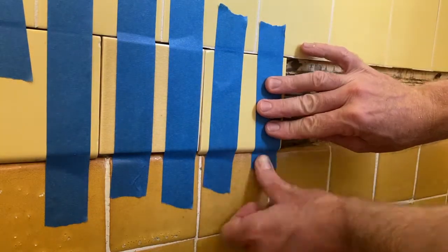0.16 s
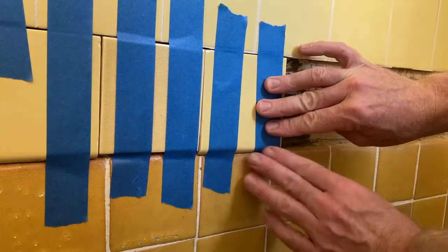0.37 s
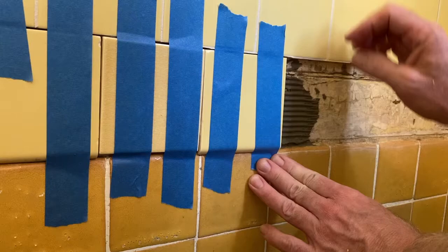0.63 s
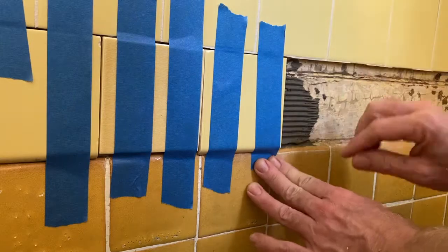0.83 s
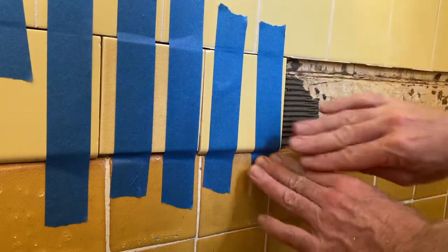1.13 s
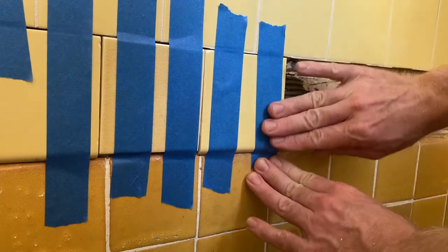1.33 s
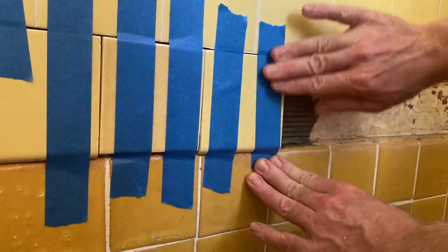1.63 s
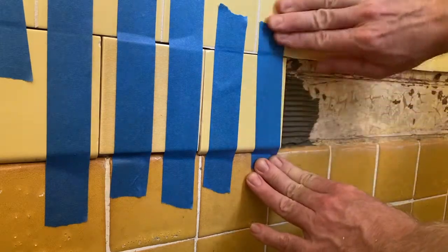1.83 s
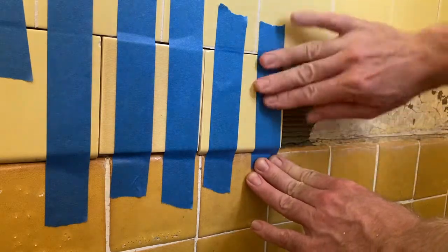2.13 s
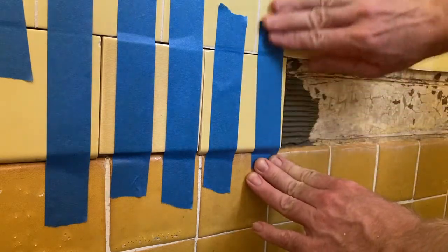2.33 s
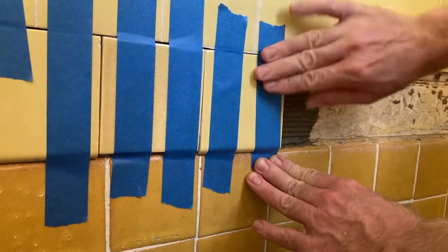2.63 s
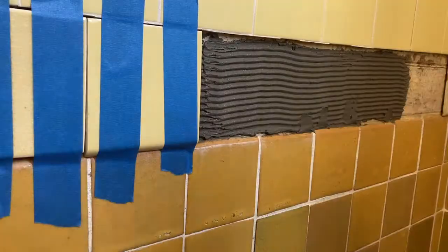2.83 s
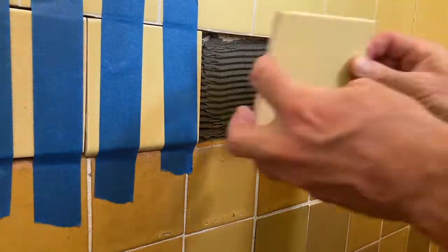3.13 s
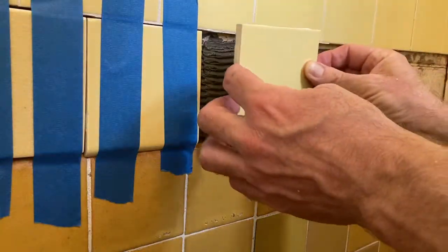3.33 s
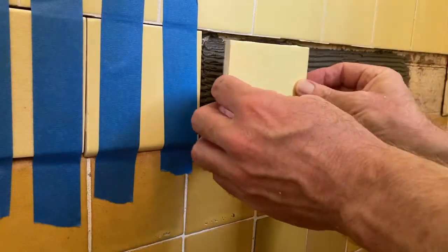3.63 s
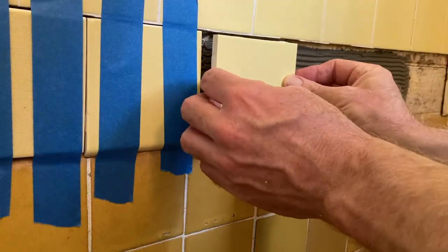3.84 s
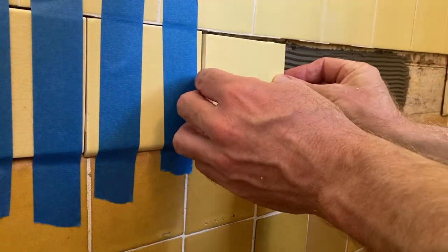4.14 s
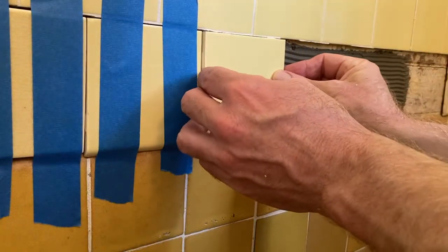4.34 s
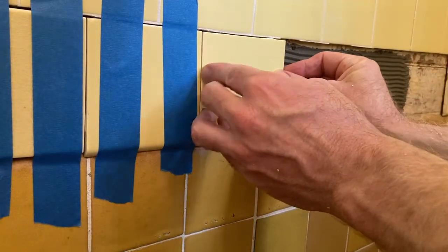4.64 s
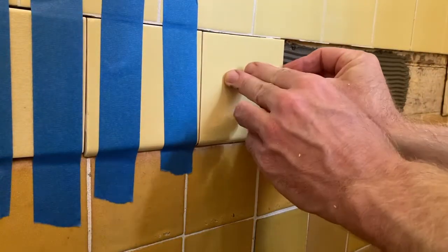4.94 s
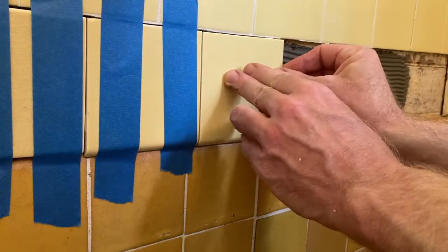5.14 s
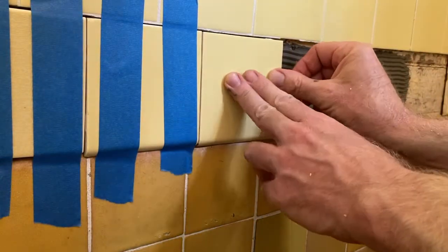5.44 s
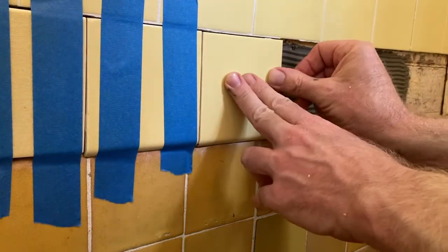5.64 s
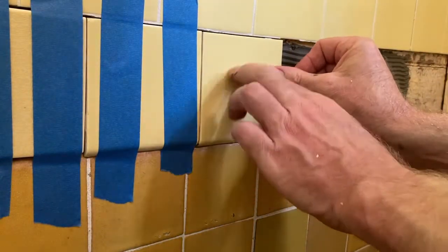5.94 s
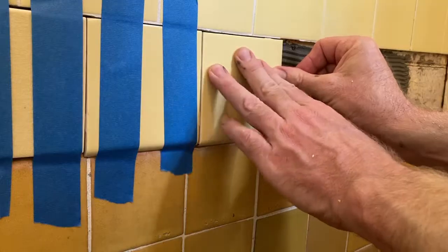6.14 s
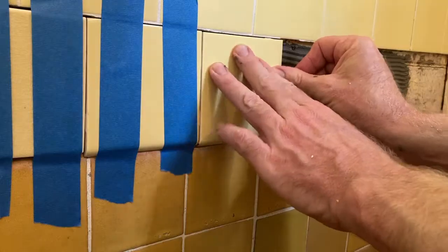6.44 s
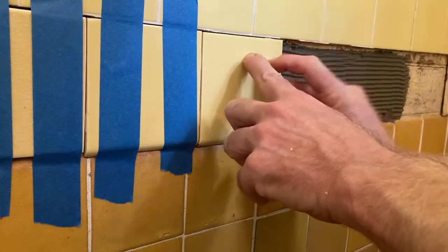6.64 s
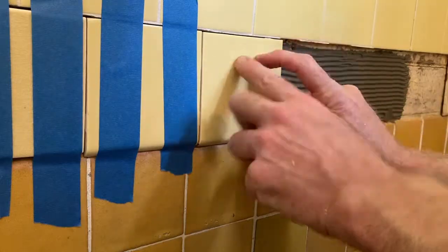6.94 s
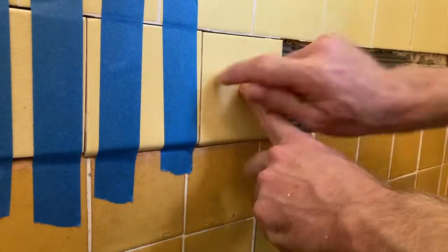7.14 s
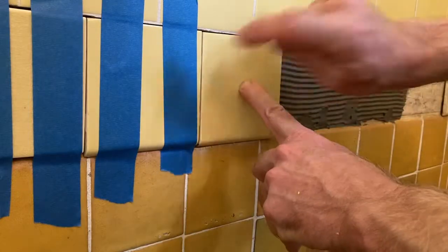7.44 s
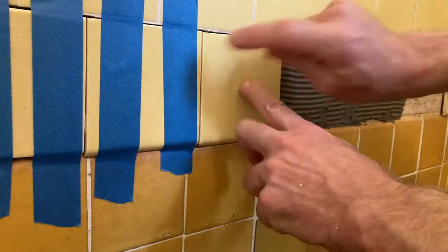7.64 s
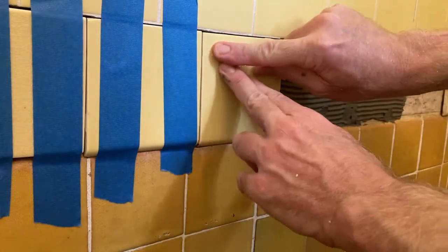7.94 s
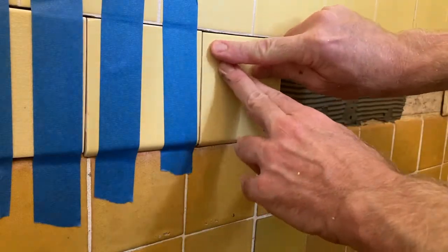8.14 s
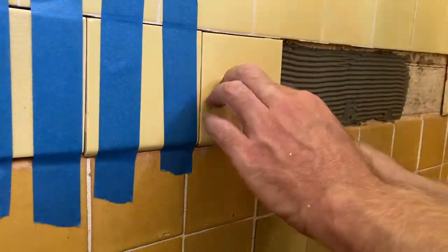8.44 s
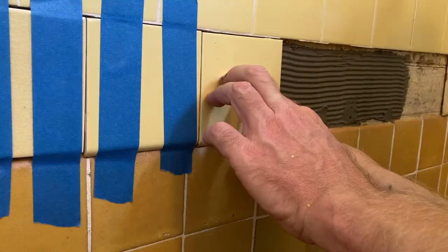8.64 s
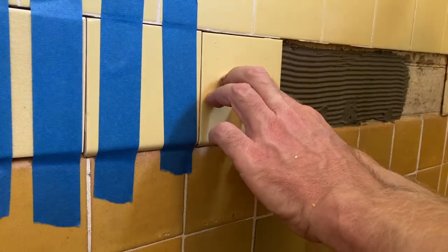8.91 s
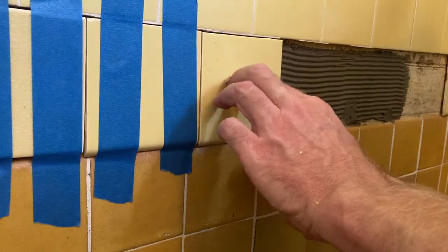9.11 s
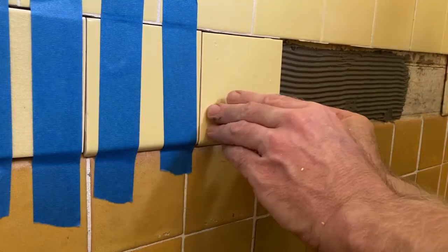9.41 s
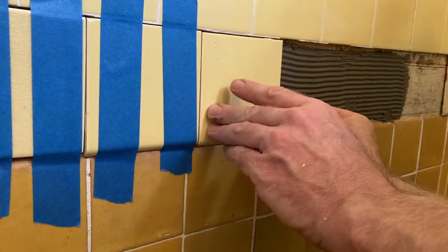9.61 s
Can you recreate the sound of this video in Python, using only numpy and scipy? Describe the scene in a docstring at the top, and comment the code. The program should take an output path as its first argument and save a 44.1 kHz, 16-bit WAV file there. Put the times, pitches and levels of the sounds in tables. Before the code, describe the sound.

Soft thump and dry hissing rubs of tape on tile, faint gritty crackles, then two rapid volleys of hollow finger knocks in a humming bathroom.

```python
"""A finger knocks a wall tile home in its gritty adhesive, in two quick runs, in a small bathroom: each knock
sums a contact tick, the damped bending modes of the tile and the delayed boom of the hollow wall.
Before that, masking tape is torn and rubbed down: filtered noise stands for friction, short bursts for cracks.
Behind lie a drone until 0.82 s, a low rumble until 2.728 s, then a quiet room tone with a motor of
wavering harmonics that slows once, a swelling hum and a distant rumble."""
import sys
import numpy as np
from scipy import signal
from scipy.fft import rfft, irfft
from scipy.io import wavfile
from scipy.ndimage import uniform_filter1d, map_coordinates

SR = 44100
rng = np.random.default_rng(int(sys.argv[2]) if len(sys.argv) > 2 else 0)


def wav_record(signal):
    """Record a signal, one row per channel, as 16-bit PCM in the file named by sys.argv[1]."""
    frames = np.transpose(np.atleast_2d(signal))
    bounded = np.clip(frames, -1, 1)
    # unit amplitude maps onto the largest positive 16-bit level
    quanta = np.round(bounded * 32767).astype(np.int16)
    wavfile.write(sys.argv[1], SR, quanta)


N = 430857

# Every spectrum below, each row: frequency in Hz, relative level in dB per Hz.
# Spectra of the drone, the low rumble, the quiet room and the distant rumble.
DRONE_SPECTRUM = [(30, -48), (53, -7), (80, -14), (108, -7), (138, -5.5), (165, -1), (245, -11.5),
                  (320, -1), (400, -17), (590, -11), (720, -22.5), (860, -21), (1400, -37.5),
                  (14000, -59.5)]
RUMBLE_SPECTRUM = [(25, -6), (56, -2.5), (85, 0), (115, -8.5), (155, -8), (290, -10), (470, -24),
                   (620, -33), (1500, -42.5), (6500, -56.5), (16000, -62)]
QUIET_SPECTRUM = [(25, -36), (50, -16), (85, -15), (140, -2.5), (220, -16), (330, -25), (520, -31),
                  (800, -40), (1250, -38.5), (2000, -48.5), (4000, -49.5), (9000, -53.5), (16000, -62)]
FAR_SPECTRUM = [(40, -12), (75, 2), (150, -4.5), (290, -4), (380, -16.5), (500, -9.5), (720, -23.5),
                (1000, -32), (3000, -43.5)]
# Level of the distant rumble. Each row: time in seconds, level in dB.
FAR_LEVEL = [(3.8, -93), (4.25, -62.5), (5.4, -66.5), (5.85, -56), (6.2, -63.5), (9.7, -62.5)]
# Steady tones within the drone and the rumble. Each row: frequency in Hz, level in dB.
DRONE_TONES = [(112, -52), (600, -63)]
RUMBLE_TONES = [(55, -50), (165, -59)]
# Harmonics of the motor. Each row: multiple of the speed, relative level in dB when fast, in dB when slow.
HARMONICS = [(1, -26, -19), (2, -0.5, -0.5), (5, -23, -15.5), (6, -24.5, -13.5), (8, -29, -36),
             (10, -56, -26.5)]
# A second hum that swells and sinks. Each row: time in seconds, frequency in Hz, level in dB.
SWELL = [(2.75, 170, -57.5), (3.97, 168, -55), (4.61, 167.8, -50.5), (5.42, 166.6, -47),
         (5.8, 163.4, -51.5), (5.97, 162.4, -71), (6.5, 162.8, -51), (8.15, 162.7, -54),
         (8.35, 163.2, -44.5), (8.65, 165.1, -55.5), (9.03, 163.6, -43), (9.35, 165.3, -46),
         (9.62, 167.4, -58), (9.75, 162.2, -42.5)]
DRONE_END_S, RUMBLE_END_S = .82, 2.728
DRONE_DB, RUMBLE_DB, QUIET_DB = -50, -48.5, -59
MOTOR_FAST_HZ, MOTOR_SLOW_HZ, MOTOR_DB = 58, 54.8, -51
SLOWDOWN_S, SLOWDOWN_LENGTH_S = 5.55, 0.2

# Scuffs while handling tape and tile. Each row: start in seconds, length in seconds, level in dB.
SCUFFS = [(0.039, 0.049, -62.5), (0.11, 0.16, -66.5), (0.916, 0.06, -70), (2.805, 0.17, -61.5),
          (2.927, 0.18, -65.5), (3.03, 0.11, -64.5), (4.594, 0.037, -73), (8.252, 0.28, -66)]
# Spectra of the gritty scuffs and of a fingertip dragging over the tape's edge.
GRIT_SPECTRUM = [(410, -15), (700, -6.5), (900, -6.5), (1920, -10.5), (3640, -10.5), (4100, -12),
                 (8880, -13.5), (10500, -19.5), (15000, -30)]
DRAG_SPECTRUM = [(900, -33), (1500, -4.5), (1950, 8.5), (2600, -12), (3100, -6), (4500, -19), (9000, -20),
                 (16000, -26)]
# a scuff swells over this share of its length, then dies away after its end
SCUFF_ATTACK_SHARE, SCUFF_RELEASE_T60_S = 0.39, 0.59
DRAG_START_S, DRAG_PEAK_S, DRAG_END_S, DRAG_DB = 0.245, 0.256, 0.3, -46

# Tape snapping and grit cracking. Each row: time in seconds, level in dB.
CRACKS = [(0.0581, -59), (0.0715, -60), (0.094, -59), (0.0998, -54.5), (2.911, -58), (2.944, -66),
          (3.075, -70), (3.405, -73), (4.622, -65), (4.6535, -56), (4.665, -65), (4.669, -68), (4.921, -76),
          (5.328, -76.5), (5.609, -73), (6.378, -69.5), (8.363, -55.5)]
CRACK_SPECTRUM = [(500, -11), (1400, -1), (2000, 0), (2900, -6.5), (5500, -4), (9400, -8), (11400, -16),
                  (14700, -7), (16000, -8)]
CRACK_ROOM_T60_S = 0.096

# Fingers landing softly, the tile shifting under them. Each row: time in seconds, wall boom level in dB,
# wall thud level in dB, tile ring level in dB.
PRESSES = [(0.0997, -35.5, -41, -60), (2.189, -51, -48, -73), (4.623, -54, -52.5, -63),
           (4.653, -58, -52, -58.5), (5.63, -42.5, -56, -64), (6.564, -46, -64, -68.5),
           (7.042, -42.5, -51.5, -71), (7.968, -54, -58, -71), (8.063, -47, -60, -54.5),
           (8.363, -49.5, -58.5, -65)]
# Spectra of the boom and the thud of a pressed wall.
PRESS_BOOM_SPECTRUM = [(53, -36.5), (100, -2.5), (155, 6.5), (240, -19.5), (600, -45.5)]
PRESS_THUD_SPECTRUM = [(200, -27.5), (340, 0.5), (410, -15.5), (480, -8), (600, -13.5), (720, -13),
                       (900, -25), (2600, -70)]

# Finger strokes that rub the tape down. Each row: start in seconds, length in seconds, hiss level in dB,
# low rasp level in dB.
RUBS = [(1.348, 0.41, -58, -60), (1.514, 0.16, -52.5, -50.5), (1.63, 0.099, -48, -49.5),
        (1.713, 0.11, -49.5, -49), (2.168, 0.19, -44.5, -50), (2.617, 0.044, -56, -59),
        (2.652, 0.093, -48.5, -60)]
TAPE_SPECTRUM = [(290, -37), (500, -5), (800, -9.5), (1500, -23), (2200, -13), (3100, -19), (4500, -15.5),
                 (5300, -25.5), (7400, -9), (9100, -21), (10000, -10.5), (11200, -8.5), (12900, -16.5),
                 (13700, -26), (15000, -18)]
# Resonances of the tile under the rubbed tape. Each row: frequency in Hz, width in Hz, relative level in dB.
RASP_MODES = [(390, 70, -4.5), (610, 42, 1.5), (787, 27, 1.5), (967, 81, -7.5), (1270, 510, -19)]
RUB_ATTACK_S, RUB_RELEASE_T60_S = 0.053, 0.23
# each resonance swells and sinks as the fingers pass over it (dB, times per s)
RASP_SWING_DB, RASP_SWING_RATE = 3.5, 14

# Grit crushed behind the shifting tile. Each row: start in seconds, length in seconds, level in dB.
CRUNCHES = [(2.902, .02, -60), (3.07, .008, -67), (4.654, .016, -62), (5.625, .03, -55), (8.07, .008, -55),
            (8.36, .014, -56.5), (8.718, .006, -59)]
CRUNCH_SPECTRUM = [(500, -13), (1000, 0), (1400, -5.5), (1950, 1.5), (2400, -4.5), (2950, 0), (3400, -6),
                   (6300, -15), (10000, -29), (15000, -38)]
CRUNCH_ATTACK_S, CRUNCH_RELEASE_T60_S = .005, .15

# Finger knocks on the tile. Each row: time in seconds, force in dB, hardness in dB, where 0 is the bare nail
# and lower is more of the fingertip.
KNOCKS = [(6.669, -23, -31), (6.7596, -18.5, -25.5), (6.8517, -17.5, -28.5), (6.936, -18.5, -31.5),
          (7.165, -24.5, -26.5), (7.2618, -23.5, -24.5), (7.3516, -22.5, -18.5), (7.439, -21, -11),
          (7.5306, -20, -12), (7.6194, -20.5, -10.5), (7.704, -27, -16), (7.821, -46.5, -16),
          (8.0722, -43, -25), (8.128, -52, -26), (8.72, -50, -36)]
# Times in seconds at which the finger moves to a new spot on the tile.
NEW_SPOT_S = [7.1, 7.9]
# What each spot adds to the force. Each row: wall boom in dB, wall body in dB, tile clack in dB,
# wall modes near 300 Hz in dB.
SPOTS = [(-1, -8.5, 0.3, -2.5), (0.25, 1, -1, 3), (-2.5, -1, 2, -18)]
# Modes of the hollow wall, of the tile on its adhesive, and the tile's high, quickly damped modes.
# Each row: frequency in Hz, relative level in dB, 60 dB decay time in seconds.
WALL_MODES = [(88, -16.5, .22), (121.9, -8.5, 0.22), (144.2, -3, 0.13), (163.7, 3, 0.17),
              (225, -13.5, 0.33), (292.6, -4.5, 0.22), (320.2, -1.5, 0.13), (433.7, -6.5, 0.096),
              (480.4, -9.5, 0.15), (537, -9, 0.18), (569, -10, 0.19), (666.4, -10, 0.13), (730, -3, 0.11)]
TILE_MODES = [(1113, -9.5, 0.07), (1181, 1, 0.067), (1234, -3, 0.091), (1383, -6, 0.09), (1556, -1, 0.074),
              (1626, -14.5, 0.063), (2094, -10.5, 0.09), (2370, -12.5, 0.07), (2550, -15.5, .07)]
GLAZE_MODES = [(2300, 5, .02), (2650, 0, .018), (3590, 2.5, .019), (4400, 3.5, .018), (5550, -4, .018),
               (6280, -1, 0.02), (8200, 1.5, .018), (9400, -2, .018)]
# Spectra of the contact tick, the tile's clatter and the scattered part of the wall's body.
TICK_SPECTRUM = [(1500, -20.5), (2100, -6), (3100, -13.5), (3600, -5.5), (4400, -8.5), (5000, -12),
                 (6200, -14), (7500, -18.5), (9500, -16), (11000, -32.5), (13000, -25), (15000, -16.5)]
CLATTER_SPECTRUM = [(600, -14.5), (900, -10.5), (1150, 9), (1600, -3), (1900, -11), (2500, -15),
                    (3500, -35)]
BODY_SPECTRUM = [(150, -18.5), (230, -10.5), (320, -7), (390, -8.5), (550, -7), (740, -2), (900, -18.5),
                 (1600, -53)]
# wall modes below this swing up slowly as a boom
BOOM_TOP_HZ = 200
# the tile's first bending mode and its overtone, before the firmness of the blow shifts their pitch
FLEX_HZ, FLEX_RISE_S = 1420, .00058
OVERTONE_HZ, OVERTONE_DB = 2190, -13
# levels against the first bend
RING_DB, CLATTER_DB = -4, -4
# the contact tick follows the hardness fully, the clack by a share of it
TICK_DB, CLACK_SHARE = -1.5, .25
# level of the high modes against the force; each varies in strength from knock to knock
GLAZE_DB, GLAZE_SPREAD_DB = 7, 3.5
# a soft contact loses more of the high modes the higher they lie (Hz, exponent)
SOFT_HZ, SOFT_POWER = 6100, 0.46
# lag between the microphone ports, longer for the high modes
PORT_LAG_S, GLAZE_LAG_S = 0.00013, .00027
TOP_HZ = 16300


def undb(db):
    """Level in decibels is twenty times the logarithm of the gain; this inverts it."""
    return 10 ** (np.asarray(db) / 20)


def unit(x):
    """Root mean square as the measure of steady strength: scale it to 1."""
    return x / np.sqrt(np.mean(x ** 2))


def unit_hit(x):
    """Energy as the measure of a blow: scale it to that of 50 ms at rms 1."""
    energy = np.sum(x ** 2) / len(x)
    return x / np.sqrt(energy / (SR / 20))


def curves(table):
    """Linear interpolation in time of each column after the first."""
    s, *columns = np.transpose(table)
    return [np.interp(np.arange(N) / SR, s, c) for c in columns]


def between(start, end):
    """Gating: a sound passes between two times, with 10 ms edges."""
    t = np.arange(N) / SR
    return uniform_filter1d(1. * ((t >= start) & (t < end)), size=441)


def walk(rate):
    """Slow random fluctuation: held random steps, smoothed twice, with a spread near 1."""
    k = max(int(SR / rate), 1)
    steps = np.repeat(rng.standard_normal(N // k + 1), k)
    return 1.3 * uniform_filter1d(uniform_filter1d(steps, k), k)[:N]


def colour(x, spectrum):
    """Minimum-phase filtering: the folded cepstrum makes a causal response with the given outline."""
    size = 4096
    hz, db = np.transpose(sorted(spectrum))
    bins_hz = np.arange(size // 2 + 1) * SR / size
    log_gain = np.log(undb(np.interp(np.log(bins_hz + 1), np.log(hz), db)))
    cepstrum = irfft(log_gain)
    cepstrum[1:size // 2] *= 2
    cepstrum[size // 2 + 1:] = 0
    response = irfft(np.exp(rfft(cepstrum)))
    return signal.fftconvolve(x, response[None], axes=1)[:, :x.shape[1]]


def pair(n, width):
    """Interaural coherence: noise of width 0 is the same left and right, of width 1 unrelated."""
    mid, side = rng.standard_normal((2, n))
    return np.array([mid + width * side, mid - width * side])


def from_left(x, lag):
    """Time difference of arrival: the sound reaches the right port a moment after the left."""
    i = np.arange(x.shape[1])
    return np.array([x[0], map_coordinates(x[1], [i - lag * SR], order=3)])


def fade(t, t60):
    """Exponential decay of a damped vibration, 60 dB in t60 seconds."""
    return undb(-60 * t / max(t60, .002))


def ring(modes, t, detune, spread_db=0):
    """Modal superposition: damped sines, varied in pitch and, with a spread, in strength at every blow."""
    pitch, strength = rng.standard_normal((2, len(modes)))
    y = 0
    for k, (hz, db, t60) in enumerate(modes):
        gain = (-1) ** k * undb(db + spread_db * strength[k])
        y = y + gain * fade(t, t60) * np.sin(2 * np.pi * hz * (1 + detune * pitch[k]) * t)
    return np.array([y, y])


def burst(t, spectrum, direct_t60, room_db, room_t60, width, wall_hz=16000):
    """Impulse and reverberation: a short crack plus decaying reflections, weakened above wall_hz."""
    direct = pair(len(t), 0) * fade(t, direct_t60)
    room = pair(len(t), width) * fade(t, room_t60) * undb(room_db)
    dull = signal.sosfilt(signal.butter(4, wall_hz, fs=SR, output="sos"), room)
    return unit_hit(colour(direct + dull, spectrum))


def add(out, s, x):
    """Superposition: mix x into out from time s."""
    i = max(int(s * SR), 0)
    out[:, i:i + x.shape[1]] += x[:, :N - i]


def stroke(start, length, attack, release_t60):
    """Envelope of one hand movement: it gathers speed, holds and decays exponentially."""
    t = np.arange(N) / SR - start
    onset = np.clip(t / max(attack, .002), 0, 1) ** 2
    return onset * fade(np.maximum(t - length, 0), release_t60)


def friction(spectrum, grain_db, slip_db):
    """Stick-slip friction: countless tiny catches of a rough surface, in uneven slips."""
    catches = undb(grain_db * walk(1500) + slip_db * walk(77.0))
    return unit(colour(pair(N, width=0.88) * catches, spectrum))


def air(spectrum, db):
    """Diffuse-field noise, gently fluttering: coherent in the bass, spread wide in the treble."""
    highpass = signal.butter(1, 900, "high", fs=SR, output="sos")
    treble_side = signal.sosfilt(highpass, rng.standard_normal(N))
    noise = pair(N, width=.08) + .7 * np.array([treble_side, -treble_side])
    return unit(colour(noise, spectrum)) * undb(db + .8 * walk(9))


def tone(hz, db):
    """Frequency and amplitude modulation: a hum line that wavers in pitch and level."""
    phase = 2 * np.pi * np.cumsum(hz * (1 + .004 * walk(12))) / SR
    return np.sqrt(2) * np.sin(phase) * undb(db + 1.5 * walk(11))


def motor():
    """Harmonic series of a rotating machine: it slows once, and the balance of its harmonics shifts."""
    slowed = np.clip((np.arange(N) / SR - SLOWDOWN_S) / SLOWDOWN_LENGTH_S, 0, 1)
    speed = MOTOR_FAST_HZ + slowed * (MOTOR_SLOW_HZ - MOTOR_FAST_HZ)
    hum = 0
    for k, fast_db, slow_db in HARMONICS:
        waver_db = .35 * k * walk(4)  # higher harmonics come and go more strongly
        hum = hum + tone(k * speed, MOTOR_DB + fast_db + slowed * (slow_db - fast_db) + waver_db)
    return hum


def room_tone():
    """Broadband noise plus hum lines: a fan-like drone, a low rumble, then a quiet room with a motor."""
    drone = air(DRONE_SPECTRUM, DRONE_DB) + sum(tone(hz, db) for hz, db in DRONE_TONES)
    rumble = air(RUMBLE_SPECTRUM, RUMBLE_DB) + sum(tone(hz, db) for hz, db in RUMBLE_TONES)
    far = air(FAR_SPECTRUM, curves(FAR_LEVEL)[0] + 2.5 * walk(6))
    quiet = motor() + tone(*curves(SWELL)) + air(QUIET_SPECTRUM, QUIET_DB) + far
    early = drone * between(0, DRONE_END_S) + rumble * between(DRONE_END_S, RUMBLE_END_S)
    return early + quiet * between(RUMBLE_END_S, N / SR)


def handling():
    """Sliding friction: dry, gritty scuffs of skin, tape and tile, and one short drag of a fingertip."""
    scuffs = np.zeros(N)
    for start, length, db in SCUFFS:
        sweep = stroke(start, length, SCUFF_ATTACK_SHARE * length, SCUFF_RELEASE_T60_S)
        scuffs = np.maximum(scuffs, sweep * undb(db))
    drag = np.interp(np.arange(N) / SR, [DRAG_START_S, DRAG_PEAK_S, DRAG_END_S], [0, 1, 0]) ** 2
    grit = friction(GRIT_SPECTRUM, grain_db=2.8, slip_db=1.3)
    skin = friction(DRAG_SPECTRUM, grain_db=2.2, slip_db=1.5)
    return grit * scuffs + skin * drag * undb(DRAG_DB)


def cracks():
    """Sudden fracture: tiny sharp impulses, each followed by reflections from the hard walls."""
    out, t = np.zeros((2, N)), np.arange(SR // 4) / SR
    for s, db in CRACKS:
        crack = burst(t, CRACK_SPECTRUM, direct_t60=0.009, room_db=-8, room_t60=CRACK_ROOM_T60_S, width=0.97)
        add(out, s, crack * undb(db))
    return out


def presses():
    """Slow excitation of a panel: the tile rings faintly, the wall thuds, then booms."""
    out, t = np.zeros((2, N)), np.arange(SR // 2) / SR
    for s, boom_db, thud_db, tile_db in PRESSES:
        boom = burst(t, PRESS_BOOM_SPECTRUM, direct_t60=0.05, room_db=-19.5, room_t60=0.29, width=0.13)
        boom = unit_hit(boom * (1 - np.exp(-t / 0.022)))
        thud = burst(t, PRESS_THUD_SPECTRUM, direct_t60=0.047, room_db=-16, room_t60=0.27, width=0.2)
        thud = unit_hit(thud * (1 - np.exp(-t / 0.01)))
        high = ring(GLAZE_MODES, t, detune=.01, spread_db=3)
        tile = ring(TILE_MODES, t, detune=.01, spread_db=3) + high * undb(-10)
        tile = unit_hit(tile * (1 - np.exp(-t / 0.00075)))
        add(out, s + 0.0018, boom * undb(boom_db) + thud * undb(thud_db))
        add(out, s, from_left(tile, PORT_LAG_S) * undb(tile_db))
    return out


def rubbing():
    """Friction exciting resonance: crepe tape hisses, and a rasp wakes the tile's resonances by turns."""
    hiss_gain = rasp_gain = 0
    for start, length, hiss_db, rasp_db in RUBS:
        sweep = stroke(start, length, RUB_ATTACK_S, RUB_RELEASE_T60_S)
        hiss_gain = np.maximum(hiss_gain, sweep * undb(hiss_db))
        rasp_gain = np.maximum(rasp_gain, sweep * undb(rasp_db))
    hiss = friction(TAPE_SPECTRUM, grain_db=3, slip_db=1.3)
    slips = pair(N, width=.6) * undb(3 * walk(400))
    rasp = 0
    for hz, width, db in RASP_MODES:
        resonance = unit(signal.lfilter(*signal.iirpeak(hz, hz / width, fs=SR), slips))
        rasp = rasp + resonance * undb(db + RASP_SWING_DB * walk(RASP_SWING_RATE))
    pressure = undb(.9 * walk(35))
    return (hiss * hiss_gain + unit(rasp) * rasp_gain) * pressure * between(0, RUMBLE_END_S)


def crunches():
    """Granular crushing: sand in the adhesive gives way in a short, coarse spray of grains."""
    push = 0
    for start, length, db in CRUNCHES:
        push = push + stroke(start, length, CRUNCH_ATTACK_S, CRUNCH_RELEASE_T60_S) * undb(db)
    return friction(CRUNCH_SPECTRUM, grain_db=3.4, slip_db=1) * push


def flex(t, hz, rise):
    """Heavily damped bending: the tile swings a few cycles before the adhesive stops it."""
    y = np.sin(2 * np.pi * hz * t) * t ** 2 * np.exp(-t / rise)
    return unit_hit(np.array([y, y]))


def wall(shift_db):
    """Modal coupling: how widely the wall modes near 300 Hz swing depends on the spot that is struck."""
    return [(hz, db + shift_db * (abs(hz - 300) < 40), t60) for hz, db, t60 in WALL_MODES]


def glaze(t, hard_db):
    """Contact stiffness: a nail wakes all the tile's high modes, a fingertip mainly the lower ones."""
    modes = [(hz, db + hard_db * (hz / SOFT_HZ) ** SOFT_POWER, t60) for hz, db, t60 in GLAZE_MODES]
    return ring(modes, t, detune=.014, spread_db=GLAZE_SPREAD_DB) * (1 - np.exp(-(t / .0008) ** 2))


def wall_boom(t, modes):
    """Gradual build-up of the low wall modes, which swing up after the blow."""
    low = [m for m in modes if m[0] < BOOM_TOP_HZ]
    return unit_hit(ring(low, t, detune=0.0068) * (1 - np.exp(-(t / 0.013) ** 2)))


def wall_body(t, modes):
    """Panel resonance: separate upper wall modes, plus a dense scattered part heard as noise."""
    upper = [m for m in modes if m[0] >= BOOM_TOP_HZ]
    panel = unit_hit(ring(upper, t, detune=.007, spread_db=2.5))
    dense = burst(t, BODY_SPECTRUM, direct_t60=0.027, room_db=-6.5, room_t60=0.18, width=0.31)
    return unit_hit((panel + dense * undb(-5.0)) * (1 - np.exp(-t / 0.0017)))


def tile_clack(t, clack_db):
    """Contact time sets pitch: a softer knock stays in contact longer, so its bend sounds lower."""
    firmness = undb((clack_db + 22) / 15)
    bend = flex(t, FLEX_HZ * firmness, FLEX_RISE_S)
    bend = bend + flex(t, OVERTONE_HZ * firmness, FLEX_RISE_S / 2) * undb(OVERTONE_DB)
    tile = unit_hit(ring(TILE_MODES, t, detune=.009, spread_db=3.5) * (1 - np.exp(-t / .0022)))
    clatter = burst(t, CLATTER_SPECTRUM, direct_t60=0.013, room_db=-11.0, room_t60=0.16, width=0.63)
    return bend + tile * undb(RING_DB) + clatter * undb(CLATTER_DB)


def knocks():
    """Impact on coupled plates: the fingertip ticks, the tile clacks, and the wall behind swings up later."""
    out, t = np.zeros((2, N)), np.arange(SR // 2) / SR
    # knocks on one spot reach the microphone by the same reflections
    ticks = [burst(t, TICK_SPECTRUM, direct_t60=0.003, room_db=-10.5, room_t60=0.1, width=1.0, wall_hz=10300)
             for _ in SPOTS]
    for s, force_db, hard_db in KNOCKS:
        spot = np.searchsorted(NEW_SPOT_S, s)
        *gains_db, shift_db = SPOTS[spot]
        boom_db, body_db, clack_db = force_db + np.array(gains_db)
        clack_db = clack_db + CLACK_SHARE * hard_db
        tick_db = force_db + TICK_DB + hard_db
        modes = wall(shift_db)
        boom = wall_boom(t, modes) * undb(boom_db + np.array([[-.5], [.5]]))  # leans right
        body = wall_body(t, modes) * undb(body_db)
        clack = tile_clack(t, clack_db) * undb(clack_db)
        tick = ticks[spot] * undb(tick_db)
        add(out, s, from_left(glaze(t, hard_db), GLAZE_LAG_S) * undb(force_db + GLAZE_DB))
        add(out, s, from_left(boom, PORT_LAG_S))
        add(out, s, from_left(body, lag=0.0001))
        add(out, s, from_left(clack + tick, PORT_LAG_S))
    return out


def scene():
    """Superposition of handwork on the wall and the room tone, which leans slightly right."""
    lean_db = .5
    background = room_tone() * undb([[-lean_db], [lean_db]])
    return background + handling() + cracks() + presses() + rubbing() + crunches() + knocks()


def record(dry):
    """Band limiting: the recorder drops the deepest bass and cuts the top."""
    lean = signal.sosfilt(signal.butter(4, 42, "high", fs=SR, output="sos"), dry)
    return signal.sosfilt(signal.ellip(8, .2, 70, TOP_HZ, fs=SR, output="sos"), lean)


dry = scene()
out = record(dry)
wav_record(out)
```